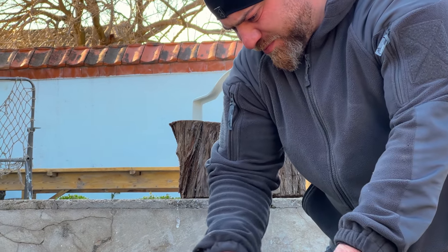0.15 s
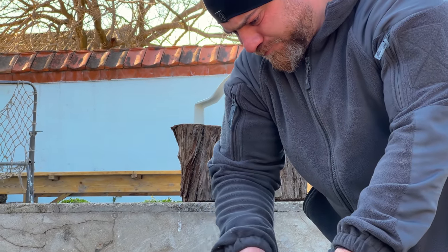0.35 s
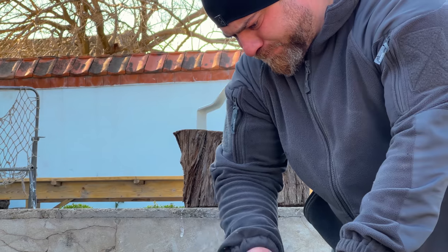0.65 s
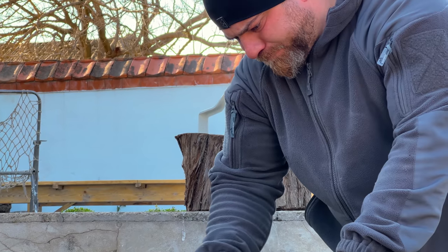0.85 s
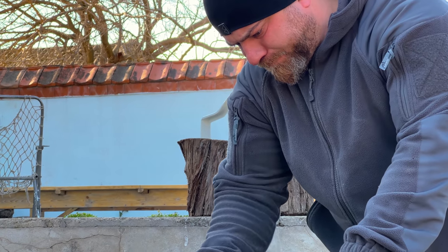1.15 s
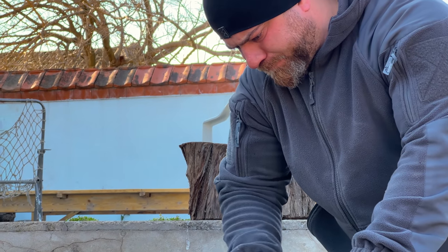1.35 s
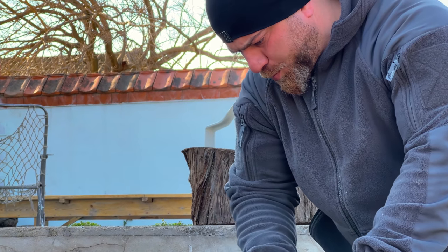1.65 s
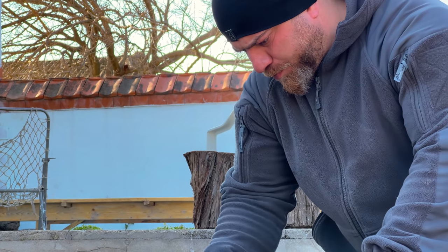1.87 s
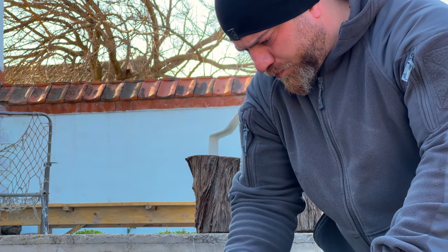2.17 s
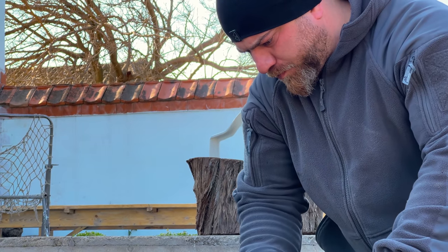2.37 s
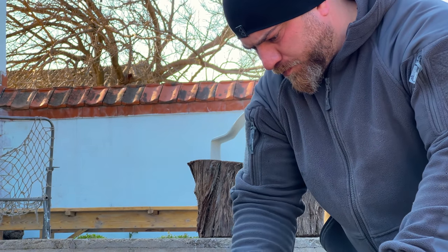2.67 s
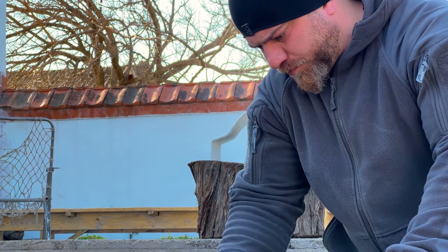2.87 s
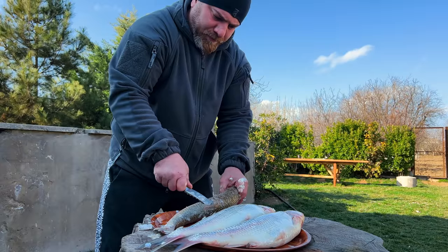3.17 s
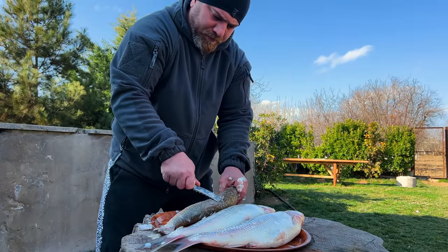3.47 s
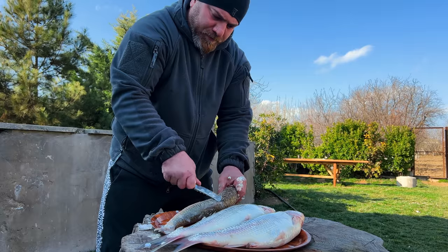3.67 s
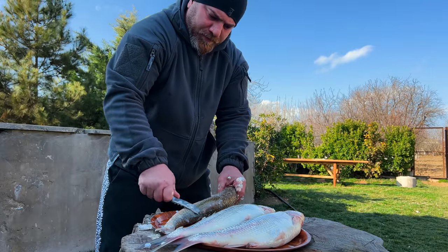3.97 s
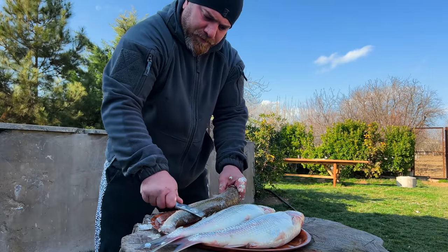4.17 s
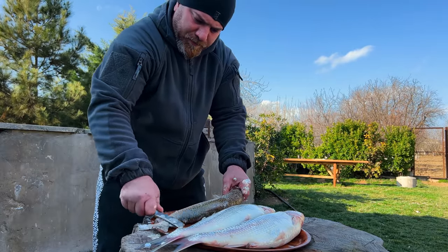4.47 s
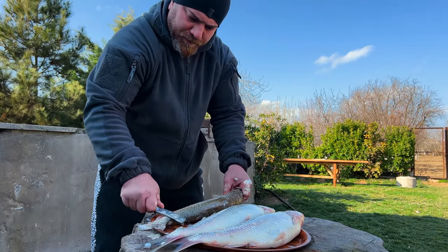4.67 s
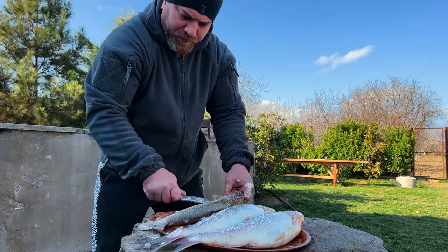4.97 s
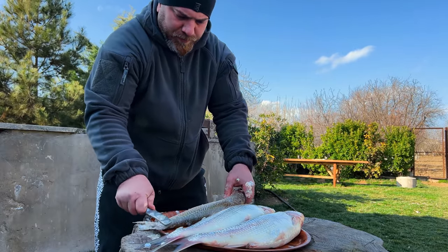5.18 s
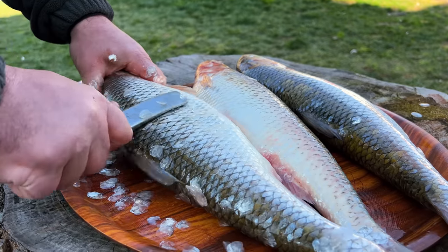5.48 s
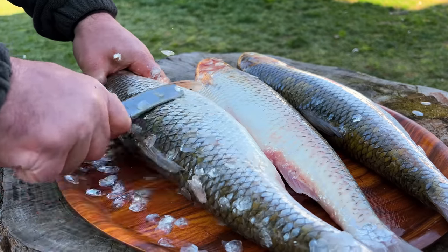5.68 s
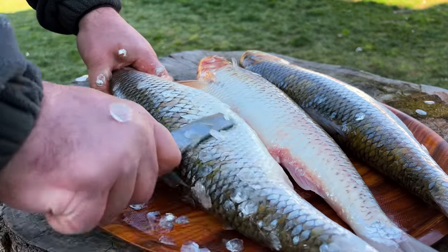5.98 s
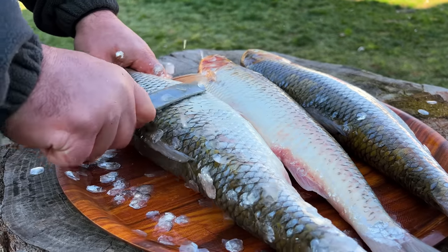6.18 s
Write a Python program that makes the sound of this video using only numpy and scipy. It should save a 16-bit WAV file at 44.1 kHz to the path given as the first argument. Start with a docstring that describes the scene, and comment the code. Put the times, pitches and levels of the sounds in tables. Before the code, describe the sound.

A faint hush lies under rhythmic fish scaling: bright gritty bursts, a lighter slide back, occasional sharp snaps, low thuds and a few taps on a wooden tray. Thin bird whistles pass far away. The phone microphone listens from beside, then from the front, and finally very close, where longer, loud crackling strokes dominate in the open, nearly echo-free air.

```python
"""First a thin steady hush, and at once the dry crackle of a knife scaling a fish, three or four strokes a second.
Pushes burst into dense clicks with rasp and body; the blade slides back more softly, and stiff scales snap loose.
Filtered noise makes the hush and thuds, ringing jolts the knocks of fish and tray, gliding sines the far-off birds.
A phone hears the knife from beside the block, then from the front, and at last close to the blade."""
import sys
import numpy as np
from scipy import signal
from scipy.fft import rfft, irfft
from scipy.io import wavfile
from scipy.ndimage import uniform_filter1d

SR = 44100
rng = np.random.default_rng(int(sys.argv[2]) if len(sys.argv) > 2 else 0)


def unload_wav(signal):
    """Save mono or channel-first audio to the path in sys.argv[1] as 16-bit WAV at rate SR, clipped to [-1, 1]."""
    wavfile.write(
        sys.argv[1],
        SR,
        np.round(np.clip(np.atleast_2d(signal).T, -1, 1) * 32767).astype(np.int16),
    )


N = 279153
TIME = np.arange(N) / SR
# the phone hears from the front, and then from close to the blade, from these times (s)
FRONT_S, CLOSE_S = 3.17, 5.02


def undb(db):
    """Decibels to gain."""
    return 10 ** (np.asarray(db) / 20)


def unit(x):
    """Scale to rms 1."""
    return x / np.sqrt(np.mean(x ** 2))


def even(x, span):
    """Level out the loudness to about rms 1 over every stretch of span seconds."""
    power = uniform_filter1d(x ** 2, max(int(span * SR), 8))
    floor = 1e-6 * np.mean(x ** 2)
    return x / np.sqrt(np.maximum(power, floor))


def band(x, lo_hz, hi_hz, order=2):
    """Band-pass."""
    hi_hz = min(max(hi_hz, lo_hz + 10), SR / 2 - 10)
    return signal.sosfilt(signal.butter(order, [lo_hz, hi_hz], "band", fs=SR, output="sos"), x)


def colour(x, points, size=2048):
    """Minimum-phase filter through (f/Hz, level/dB) points, so that nothing sounds ahead of its cause."""
    hz, db = np.transpose(points)
    bins_hz = np.fft.rfftfreq(size, 1 / SR)
    curve_db = np.interp(np.log(bins_hz + 1), np.log(hz), db)
    # folding the cepstrum forwards makes the filter causal
    cepstrum = irfft(np.log(undb(curve_db)))
    cepstrum[1:size // 2] *= 2
    cepstrum[size // 2 + 1:] = 0
    response = irfft(np.exp(rfft(cepstrum)))
    return signal.fftconvolve(x, response)[:len(x)]


def swell(at, rise, fall, flatness=2):
    """A hump of height 1; high flatness gives steep sides and a level top."""
    distance = np.abs((TIME - at) / np.where(TIME < at, rise, fall))
    return np.exp(-np.minimum(distance, 10) ** flatness)


def ring(x, t60, wet_db):
    """Add a diffuse tail of decaying noise that falls 60 dB in t60 seconds."""
    t = np.arange(int(t60 * SR) + 2) / SR
    tail = rng.standard_normal(len(t)) * np.exp(-np.log(1000) * t / t60)
    return x + undb(wet_db) * signal.fftconvolve(x, tail / np.linalg.norm(tail))[:N]


def spread(make, side_db):
    """Two draws of a sound as middle and side."""
    middle, side = make(), make()
    return middle + undb(side_db) * side * np.array([[1], [-1]])


def crack(sizes, crack_s, tail_s, tail_db):
    """Loudness contour of a row of clicks: each has a sharp crack and a short tail off tray and block."""
    t = np.arange(int(0.047 * SR)) / SR
    sharp = np.exp(-t / crack_s) / crack_s
    tail = undb(tail_db) ** 2 * np.exp(-t / tail_s) / tail_s
    return np.sqrt(np.abs(signal.fftconvolve(sizes ** 2, (sharp + tail) / SR)[:N]))


# colour of the steady background hush, with a narrow dip near 10.5 kHz: f/Hz, level/dB (relative)
HUSH_COLOUR = [(30, -24), (75, 1), (108, 4.5), (170, -7.5), (400, -6), (700, -15.5), (1100, -17),
               (3200, -27), (8000, -25), (10500, -46), (12300, -21), (16000, -28)]


def hush():
    """Quiet background hush: wide coloured noise whose level wavers a little."""
    drift_db = 0.59 * unit(band(rng.standard_normal(N), 0.15, 6, order=1))
    noise = spread(lambda: unit(colour(rng.standard_normal(N), HUSH_COLOUR)), side_db=-2.5)
    return noise * undb(-74.5 + drift_db)


# bird whistles: start t/s, length/s, start f/Hz, end f/Hz, level/dB before the flutter
BIRD_WHISTLES = [(0.729, 0.23, 2450, 3190, -87.5), (0.793, 0.1, 6030, 6170, -80),
                 (0.89, 0.063, 6630, 6760, -76), (1.053, 0.094, 3740, 3190, -70),
                 (1.11, .13, 3100, 3320, -80), (1.194, 0.073, 6580, 6820, -75.5),
                 (1.427, 0.21, 4073, 3980, -73), (2.054, 0.16, 3810, 3730, -79),
                 (3.685, .3, 2350, 3460, -86.5), (3.85, 0.11, 3220, 3440, -81),
                 (4.406, 0.14, 5430, 5230, -85)]


def birds():
    """Thin sine whistles that glide quickly and then settle, and one faint low hoot, with a garden echo."""
    out = np.zeros(N)
    waver = 1 + .004 * unit(band(rng.standard_normal(N), 15, 90, order=1))
    for at, length, start_hz, end_hz, db in BIRD_WHISTLES:
        part = np.clip((TIME - at) / length, 0, 1)
        hz = (end_hz + (start_hz - end_hz) * (1 - part) ** 2) * waver
        tone = np.sin(2 * np.pi * np.cumsum(hz) / SR)
        out += undb(db) * np.sqrt(2) * np.sin(np.pi * part) * tone
    out *= undb(3.3 * unit(band(rng.standard_normal(N), 4.1, 59)))  # the notes flutter
    # the hoot has only the 2nd to 4th harmonics of 410 Hz
    phase = 2 * np.pi * np.cumsum(410 * waver) / SR
    hoot = sum(undb(-76 - 3.9 * k) * np.sin((k + 2) * phase) for k in range(3))
    out += swell(2.22, 0.064, 0.17) * hoot
    return np.array([ring(out, .5, -9) for _ in range(2)])


# dull bumps as the fish is pressed and shifted: peak t/s, rise and fall/s, level/dB
BLOCK_BUMPS = [(0.083, 0.061, -59), (0.131, 0.0092, -55), (0.218, 0.079, -61), (1.447, 0.042, -63.5),
               (1.552, 0.1, -62.5), (2.145, 0.038, -55.5), (2.243, 0.019, -51.5), (2.543, 0.015, -60.5),
               (5.214, 0.067, -56), (5.267, 0.006, -55), (5.532, 0.06, -59), (5.619, 0.015, -50.5),
               (5.798, 0.053, -56), (6.114, 0.022, -48), (6.24, 0.044, -63.5)]


def bumps():
    """Soft low thuds of noise through the heavy block, over a rumble of the holding hand that is louder close up."""
    force = undb(np.interp(TIME, [CLOSE_S, CLOSE_S + 0.17], [-76, -63]))  # rumble, dB
    for at, length, db in BLOCK_BUMPS:
        force = force + undb(db) * swell(at, length, length)
    thud = [(70, -34.0), (110, 5.5), (150, -2.0), (230, -6.5), (400, -26.5), (3000, -46.5)]
    return force * spread(lambda: even(colour(rng.standard_normal(N), thud), span=0.056), side_db=-6.5)


# the blade taps the tray: t/s, centre f/Hz, level/dB (energy of the whole click)
TRAY_TAPS = [(1.413, 4200, -25), (2.294, 1250, -33), (2.324, 1800, -35), (5.172, 520, -29.5)]


def taps():
    """Short dry clicks of steel on wood: decaying noise in a band, with a brief tail."""
    out = np.zeros(N)
    for at, hz, db in TRAY_TAPS:
        contour = crack(signal.unit_impulse(N, int(at * SR)), crack_s=.0012, tail_s=.004, tail_db=-8)
        click = band(contour * rng.standard_normal(N), hz * 0.66, hz * 1.37)
        out += undb(db) * click / np.linalg.norm(click)
    return np.array([ring(out, .06, -4) for _ in range(2)])


def scales(per_s, scatter_db):
    """Scales flick past the edge: many tiny clicks and a few large ones."""
    hit = rng.random(N) < per_s / SR
    size = undb(scatter_db * np.minimum(rng.exponential(size=N), 5.5))
    return hit * size * rng.choice([-1, 1], N)


# resonance of fish and tray, which changes as the fish is shifted: t/s, f/Hz, level/dB re the stroke's body
FISH_RESONANCE = [(0.1, 1000, -2.5), (0.4, 926, 1), (1.7, 884, 1), (2.02, 1480, 3.5), (2.37, 453, -3),
                  (4.2, 402, 1), (4.9, 385, -0.5), (5.1, 423, -9)]
# pushes of the blade: hardest pressure t/s, length/s, crackle level/dB, bite level/dB re crackle
# (passes() plays them too)
PUSHES = [(0.094, 0.064, -51, -8), (0.397, 0.079, -51, -8), (0.683, 0.055, -46.5, -9),
          (0.983, 0.069, -51, -3.5), (1.316, 0.075, -49.5, -3), (1.7, 0.066, -50, -3),
          (2.025, 0.066, -51.5, -17.5), (2.372, 0.073, -51, -11), (2.716, 0.074, -50.5, -9.5),
          (3.02, 0.083, -52, -13), (3.233, 0.048, -47.5, -26.5), (3.447, 0.048, -45, -42),
          (3.658, 0.036, -43.5, -42), (3.863, 0.056, -50.5, -41), (4.194, 0.13, -54.5, -11.5),
          (4.551, 0.072, -55, -7.5), (4.891, 0.082, -53.5, -9), (5.07, 0.11, -42, -12.5),
          (5.409, 0.12, -30.5, -17.5), (5.653, 0.097, -31, -18), (5.896, 0.11, -31, -17),
          (6.154, 0.12, -30.5, -16)]


def knocks():
    """The blade judders late in each stroke, harder with more bite; each jolt rings fish and tray."""
    out = np.zeros(N)
    times, ring_hz, ring_db = np.transpose(FISH_RESONANCE)
    judder_at, judder_cycles = 0.32, 16.1  # delay as a share of stroke length; half-length in cycles
    for at, length, db, bite_db in PUSHES:
        hz = np.interp(at, times, ring_hz)
        span = judder_cycles / hz
        jolts = scales(900, 2.0) * swell(at + judder_at * length, span, span)
        body = band(jolts, hz * 0.77, hz * 1.17)
        level = undb(db + bite_db + np.interp(at, times, ring_db))
        out += level * body * np.sqrt(span * SR / np.sum(body ** 2))
    return np.array([ring(out, 0.06, -7) for _ in range(2)])


# the blade slides lightly back: middle t/s, length/s, crackle level/dB
BACK_SLIDES = [(0.224, 0.084, -62.5), (0.54, 0.23, -64), (0.796, 0.073, -59.5), (1.099, 0.079, -59),
               (1.465, 0.089, -59.5), (1.656, 0.082, -51), (1.915, 0.23, -70.5), (2.25, 0.021, -52.5),
               (2.874, 0.042, -61), (3.371, 0.043, -60.5), (3.587, 0.042, -56.5), (3.784, 0.046, -62),
               (4.071, .08, -57), (4.41, 0.072, -64.5), (4.756, 0.093, -63), (4.845, 0.034, -66),
               (5.347, 0.031, -42), (5.572, 0.062, -35), (5.812, 0.076, -33), (6.053, 0.08, -33.5),
               (6.308, 0.05, -39)]


def passes(start, end, rise_share, flatness, rasp_db):
    """Strength of crackle, rasp and body as the blade pushes, digs in and slides back."""
    dig_s = 0.0089  # the body of the fish sounds this much after the crackle, the rasp half as much
    bite_rasp_db = -3.5  # rasp that the bite adds, re body
    pressure = np.zeros((3, N))
    for at, length, db, bite_db in PUSHES:
        if start <= at < end:
            rasp = undb(rasp_db) + undb(bite_db + bite_rasp_db)
            gains = undb(db) * np.array([1, rasp, undb(bite_db)])
            rise, fall = length * rise_share, length * (1 - rise_share)
            for k, narrowing in enumerate((1, 1.15, 1.4)):
                push = swell(at + dig_s * k / 2, rise, fall, flatness)
                pressure[k] += gains[k] * push ** narrowing
    for at, length, db in BACK_SLIDES:
        if start <= at < end:
            gains = undb([db, db - 12.5, db - 19.5])  # crackle, rasp, body
            pressure += gains[:, None] * swell(at, length / 2, length / 2)
    return pressure


# single stiff scales that snap loose: t/s, crackle level/dB, rasp level/dB, both before snap_db is added
SCALE_SNAPS = [(0.379, -40, -65), (0.675, -42, -55), (0.955, -45, -55.5), (1.288, -48, -53),
               (1.3205, -50, -43), (1.3278, -52, -47.5), (1.5265, -46, -62), (1.6058, -38.5, -63),
               (1.826, -49.5, -67), (2.3765, -47, -60), (3.0365, -56, -50.5), (3.4314, -36, -55),
               (3.4485, -35, -45.5), (3.659, -51, -60), (3.857, -36, -59), (4.383, -39, -67),
               (4.5796, -30, -46.5), (4.918, -29, -51), (5.0401, -35, -43), (5.077, -30.5, -51),
               (5.106, -23.5, -37), (5.1355, -29, -28), (5.146, -30, -33), (5.402, -19.5, -26.5),
               (5.645, -17, -45), (5.7159, -24.5, -39.5), (5.734, -24, -37), (5.793, -26, -46),
               (6.0288, -20.5, -46), (6.2154, -49, -35), (6.2503, -22.5, -29.5)]


def snapping(start, end, snap_db):
    """Strength of crackle, rasp and body at the instants when a stiff scale lets go."""
    snaps = np.zeros((3, N))
    for at, crackle_db, rasp_db in SCALE_SNAPS:
        if start <= at < end:
            snaps[:, int(at * SR)] = undb([crackle_db, rasp_db, rasp_db - 13.5])
    return snaps * undb(snap_db)


# bands of crackle, rasp and body: low f/Hz, high f/Hz
SCRAPE_BANDS = [(10500, 16500), (2800, 10500), (280, 2800)]


def scrape(pressure, snaps, clicks, tone, rows_db):
    """A light touch mostly crackles; pressure adds rasp and the body of the fish."""
    # the edge catches on one row of scales after another, which bunches the clicks
    rows = undb(rows_db * unit(band(rng.standard_normal(N), 24, 190)))
    grain = even(rows * crack(clicks, crack_s=.0002, tail_s=.0009, tail_db=-6), span=.06)
    tone_response = colour(signal.unit_impulse(1024), tone)
    # crackle, rasp and body each take their band of the colour
    out = 0
    for (lo, hi), push, snap, diffuse_db in zip(SCRAPE_BANDS, pressure, snaps, (-14, -5, -7)):
        response = band(tone_response, lo, hi, order=4)
        response = response / np.linalg.norm(response)
        snap_contour = crack(snap, crack_s=0.00013, tail_s=0.006, tail_db=-5)
        contour = np.hypot(grain * push, snap_contour)
        # every scale cracks with its own colour; part of it reaches each port by a path of its own
        burst = rng.choice([-1, 1], N) + undb(diffuse_db) * rng.standard_normal((2, N))
        out = out + signal.fftconvolve(contour * unit(burst), response[None], axes=1)[:, :N]
    return out


def blade_echo(x, lag_s, echo_db):
    """The flat of the moving blade reflects the sound with a wandering lag, so the colour shifts within a stroke."""
    lag = lag_s * np.exp(.35 * unit(band(rng.standard_normal(N), 3, 15)))
    echo = x[np.clip(np.arange(N) - (lag * SR).astype(int), 0, N - 1)]
    return (x + undb(echo_db) * echo) / np.hypot(1, undb(echo_db))


# phase by which the left port leads: f/Hz, from the side/rad, from the front/rad
PORT_PHASES = [(100, 1.14, 1.5), (1630, -8.6, 1), (3660, -0.95, 3.5), (4970, 1, 3.5), (6530, -7.8, .3),
               (8190, -0.6, -1.52), (11240, -4.5, -4), (16820, -9.5, -11)]


def ports(pair, phase, garden_db):
    """Each port gets the sound with its own phase, a reflection off the blade and a faint garden echo."""
    turn = np.interp(np.fft.rfftfreq(2 * N, 1 / SR), np.transpose(PORT_PHASES)[0], phase)
    turned = rfft(pair, 2 * N) * np.exp(.5j * turn * np.array([[1], [-1]]))  # half the lead each way
    pair = irfft(turned)[:, :N]
    coloured = blade_echo(pair.T, lag_s=.0007, echo_db=-6).T
    return np.array([ring(ear, .25, garden_db) for ear in coloured])


# colour of the scraping from beside the block: f/Hz, level/dB (relative within each scrape band)
SIDE_TONE = [(300, -10), (500, -8), (950, -3.5), (1500, -10), (2500, -9.5), (3300, -7.5), (4300, -4.5),
             (5500, -4), (6800, -1.5), (8000, -2.5), (10300, -12), (12000, -1), (15600, -5.5)]
# colour of the scraping from the front, near and far: f/Hz, level/dB (relative within each scrape band)
FRONT_TONE = [(300, -22), (700, -16), (1400, -24.5), (2700, -16), (3900, -10.5), (5000, -1), (6500, -7),
              (7600, -11), (8600, 0.5), (10500, -7), (12000, 0), (15600, -2.5)]


def knife():
    """Scraping from the three places of the phone: rounded pushes, then quick flicks, then long even pushes."""
    _, side_phase, front_phase = np.transpose(PORT_PHASES)
    rows_db, far_echo_db, close_echo_db = 2, -23, -29
    clicks = scales(per_s=1500, scatter_db=3.3)
    side = scrape(passes(0, FRONT_S, rise_share=0.42, flatness=1.126, rasp_db=-11.0),
                  snapping(0, FRONT_S, snap_db=21.0), clicks, SIDE_TONE, rows_db)
    front = scrape(passes(FRONT_S, CLOSE_S, rise_share=0.29, flatness=1.18, rasp_db=-7.5),
                   snapping(FRONT_S, CLOSE_S, snap_db=14.5), clicks, FRONT_TONE, rows_db)
    close = scrape(passes(CLOSE_S, N / SR, rise_share=0.23, flatness=5.8, rasp_db=-7.5),
                   snapping(CLOSE_S, N / SR, snap_db=17.5), clicks, FRONT_TONE, rows_db)
    far = ports(side, side_phase, far_echo_db) + ports(front, front_phase, far_echo_db)
    return far + ports(close, front_phase, close_echo_db)


def scene():
    """Background hush, birds, block, tray and knife."""
    return hush() + birds() + bumps() + taps() + knocks() + knife()


def record(dry):
    """The phone thins the deep bass and cuts the very top, above 16.2 kHz."""
    tone = [(30, -8.0), (82, -7.0), (102, 1.5), (16000, 0.5)]
    dry = np.array([colour(ear, tone, size=8192) for ear in dry])
    return signal.sosfilt(signal.ellip(10, .2, 70, 16200, fs=SR, output="sos"), dry)


dry = scene()
out = record(dry)
unload_wav(out)
```